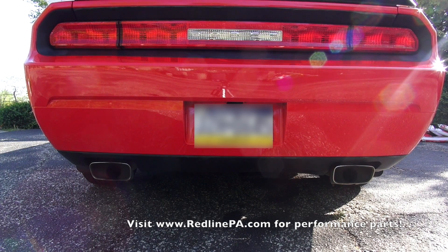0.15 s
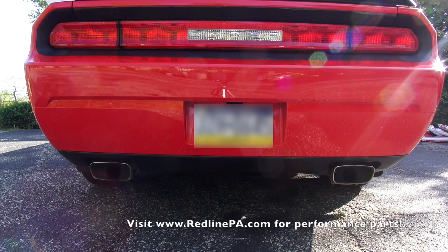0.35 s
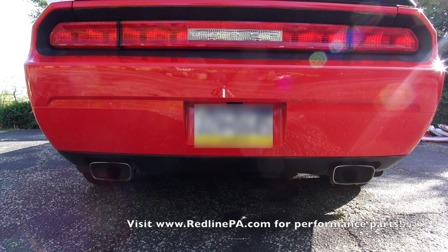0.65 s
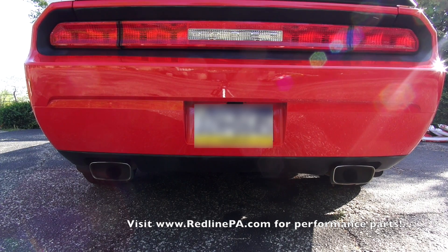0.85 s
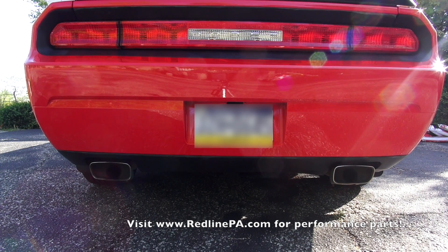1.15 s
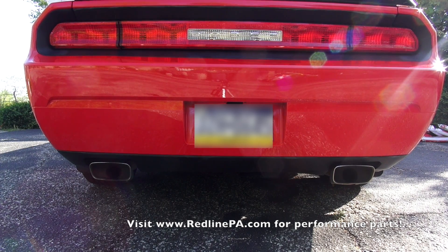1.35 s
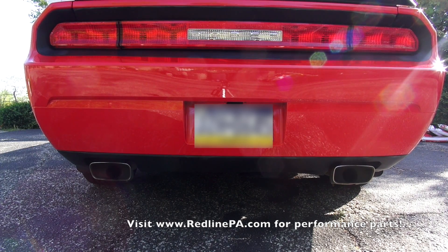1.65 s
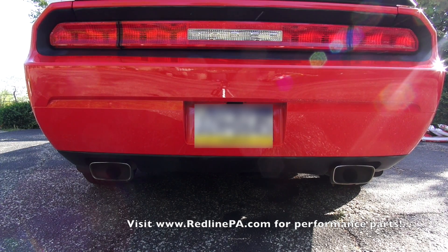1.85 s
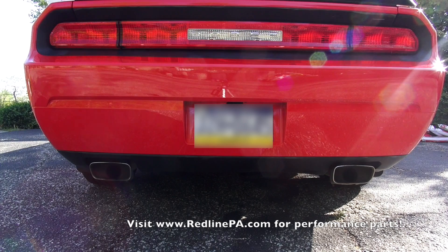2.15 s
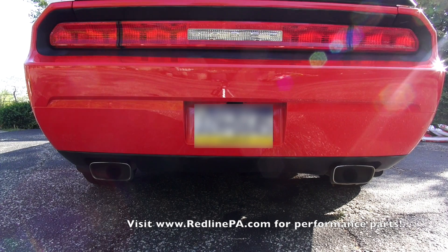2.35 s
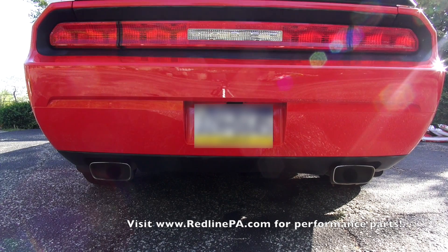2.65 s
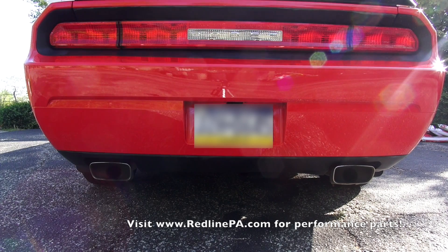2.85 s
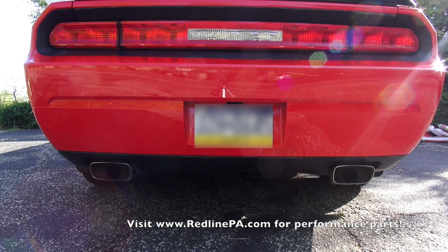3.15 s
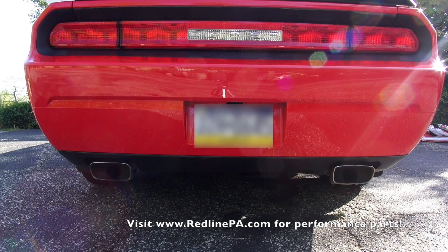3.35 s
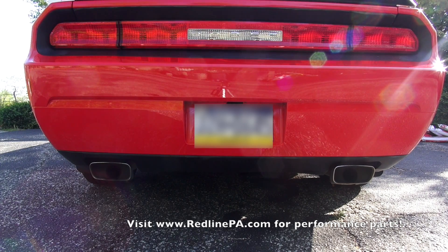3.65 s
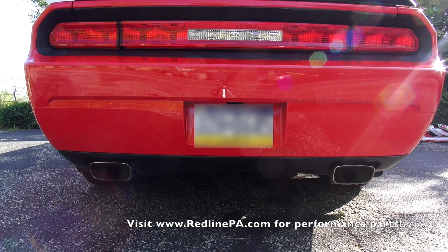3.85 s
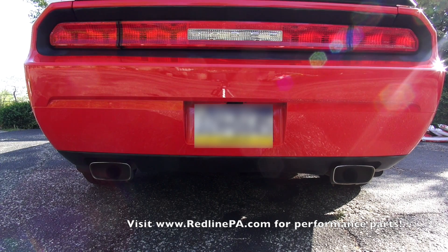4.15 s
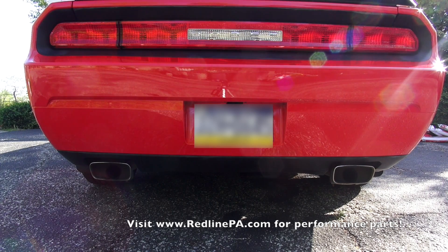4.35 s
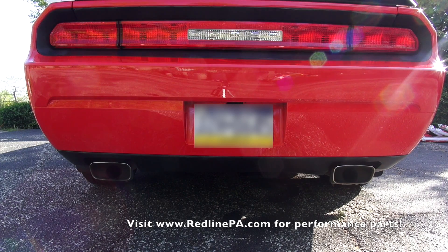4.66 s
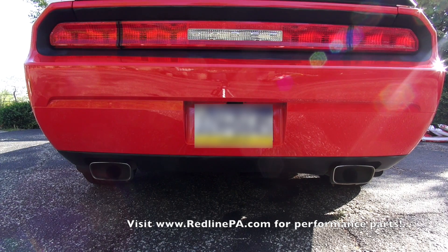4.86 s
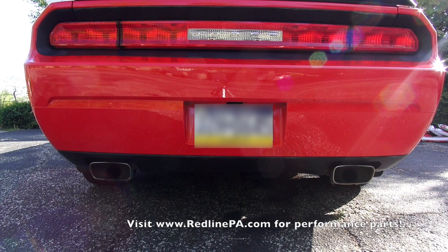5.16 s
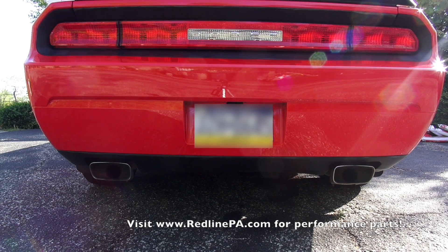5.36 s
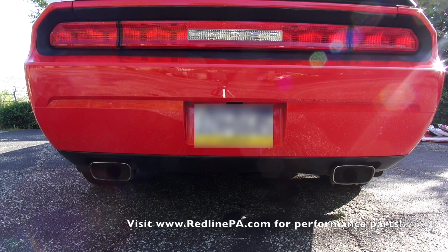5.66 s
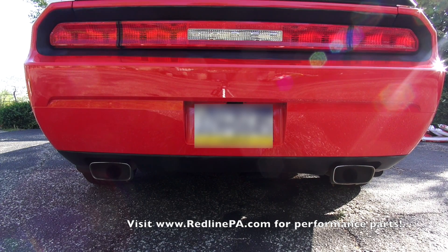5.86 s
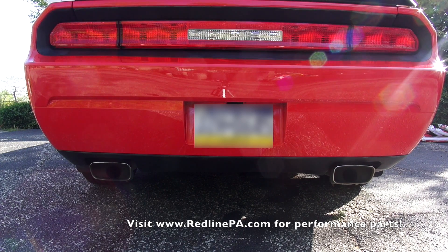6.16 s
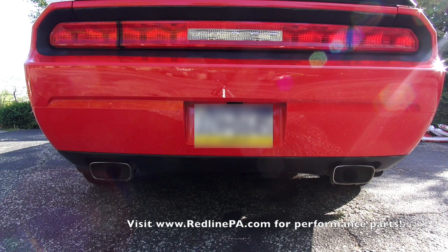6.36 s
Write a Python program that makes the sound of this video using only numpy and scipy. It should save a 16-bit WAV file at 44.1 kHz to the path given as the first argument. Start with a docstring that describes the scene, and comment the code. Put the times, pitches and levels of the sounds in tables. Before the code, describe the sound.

A big V8 car engine is heard close up, from just behind its twin tailpipes, outdoors in a driveway with very little echo. At the start it is already coasting down from a rev, its drone falling in pitch. At about 0.8 seconds it is blipped hard and climbs to a loud, raspy roar, peaking around 1.3 seconds with sharp cracks and hissing gas. It then winds down steadily, spitting a few times until about 2 seconds and deepening into a throaty burble. A very faint high hiss comes and goes from 3 to 5 seconds. By 4.3 seconds the engine has sunk to a lumpy idle of uneven low thumps, and it almost stalls near 5 seconds. It catches, and one small blip around 5.4 to 5.7 seconds lifts it into a stronger, chugging rumble, which eases back toward idle by 6.5 seconds.

```python
"""A big V8 in a driveway, heard from just behind its twin tailpipes.
It coasts down from one rev, is blipped hard, sinks to a lumpy idle and gets one more small blip.
Speed and load ride the levels of the exhaust layers. Even firings give the drone, uneven ones the
burble; gas rasps and hisses in the tips, fast pulses steepen into shocks, and single firings crack.
A faint high hiss and a short scatter off the ground, car and house sit behind it."""
import sys
import numpy as np
from scipy import signal
from scipy.fft import rfft, irfft, next_fast_len
from scipy.io import wavfile
from scipy.ndimage import uniform_filter1d

SR = 44100
rng = np.random.default_rng(int(sys.argv[2]) if len(sys.argv) > 2 else 0)


def wav_out(sig):
    """Save sig, one row per channel (or a flat mono array), as 16-bit PCM at SR to the path in sys.argv[1]."""
    wavfile.write(sys.argv[1], SR, np.round(np.clip(np.atleast_2d(sig).T, -1, 1) * 32767).astype(np.int16))


N = 286650
TIME = np.arange(N) / SR
PUFF_S, PUFF_SHARE = .0026, .16  # a puff's attack is the shorter of this time and this share of a firing

# engine speed, eight firings to a cycle: (time [s], rate [firings/s])
SPEED = [(0.0, 260.6), (0.143, 260.0), (0.793, 177.4), (1.043, 284.1), (1.205, 361.3), (1.285, 379.5),
         (2.398, 201.0), (2.879, 146.5), (3.291, 114.5), (4.268, 59.6), (4.514, 45.8), (4.96, 40.1),
         (5.02, 35.4), (5.14, 42.0), (5.29, 43.6), (5.591, 70.0), (5.742, 72.1), (6.197, 57.8), (6.5, 46.5)]
# blips of the throttle: (opens [s], shuts [s], opening [0-1])
BLIPS = [(-.3, 0.025, 0.89), (0.772, 1.275, 0.83), (5.44, 5.742, 0.58)]
# each cylinder's departure from the mean pulse, in firing order: (pressure [relative])
CYLINDERS = [1.7, -.2, .03, -.15, .57, -.08, -1.75, -.13]
# cylinder bank of each firing: (bank [0 left, 1 right])
BANKS = [0, 1, 1, 0, 1, 0, 0, 1]
# the surge and sag of a slow engine: (time [s], gain [dB])
LOPE = [(3.5, 0), (3.9, 1), (4.02, -1), (4.11, -2.5), (4.24, -0.5), (4.40, 0), (4.52, 0), (4.58, -1.5),
        (4.70, -1.5), (4.8, -2.5), (4.88, -4), (5.0, 0.5), (5.14, 2), (5.27, 2), (5.36, 7), (5.62, -3),
        (5.8, 2.5), (6.05, 0), (6.25, 4), (6.41, -2.5), (6.5, 4.5)]
# accents, the firings that stand out: (time [s], bark [dB], spit [dB], thump [relative dB])
CRACKS = [(0.786, -30, -52, -19.5), (1.027, -4, -12, -26), (1.057, -21, -11.5, -31), (1.159, -13, -3, -34),
          (1.228, -12, -10, -29), (1.248, -23, -8, -21), (1.269, -8, -24, -17.5), (1.374, -25, -18.5, -25),
          (1.447, -21, -24.5, -38), (1.608, -37, -28, -38), (1.659, -28, -19, -37),
          (1.879, -21, -24.5, -35), (3.8876, -32, -42, -17.5), (3.937, -40, -42, -21),
          (3.993, -38, -54, -19), (4.033, -36, -47, -32.5), (4.170, -42, -44, -22), (4.2, -38, -46, -30),
          (4.218, -29.5, -45, -27), (4.239, -39, -48, -24), (4.269, -44, -45, -36),
          (4.357, -35, -48, -18.5), (4.43, -44, -49, -32), (4.471, -34, -49, -24), (4.493, -48.5, -45, -22),
          (4.605, -46, -48, -17), (4.624, -42, -47, -37), (4.721, -37, -48, -17.5),
          (4.791, -40, -45.5, -19), (4.932, -33.5, -41, -19.5), (4.958, -42, -39.5, -17),
          (5.041, -27, -42, -21.5), (5.068, -35, -35.5, -16.5), (5.092, -35, -35, -16.5),
          (5.119, -25, -34, -13.5), (5.143, -27, -38, -23), (5.166, -51, -46, -22),
          (5.215, -24.5, -30, -14), (5.239, -30, -45, -19), (5.286, -34, -29, -10.5),
          (5.331, -27, -28, -18.5), (5.351, -23.5, -28.5, -10.5), (5.371, -13, -30.5, -12.5),
          (5.410, -27, -26.5, -14), (5.432, -19, -25.5, -30), (5.48, -29, -36, -20), (5.517, -24, -39, -21),
          (5.532, -26, -32, -18), (5.547, -25.5, -38, -21), (5.559, -20, -28, -28),
          (5.575, -26.5, -25, -24), (5.606, -28, -28, -31), (5.663, -24, -39, -23), (5.673, -29, -40, -21),
          (5.719, -29, -44, -17), (5.803, -37, -33.5, -12), (5.907, -24, -35, -6.5), (5.92, -31, -41, -21),
          (5.968, -42, -36.5, -6.5), (6.065, -33, -43, -15), (6.113, -29, -56, -10.5),
          (6.136, -46, -45, -10.5), (6.207, -54, -40, -19.5), (6.263, -44, -42, -26),
          (6.281, -47, -39, -13.5), (6.297, -34, -37.5, -18), (6.358, -27, -40, -11),
          (6.432, -29, -43, -10.5)]
# fader of the faint high hiss: (time [s], level [dB])
HIGH_HISS = [(2.55, -81), (2.9, -55), (3.4, -61), (3.87, -59), (4.1, -76), (4.74, -79), (4.82, -57),
             (4.89, -63), (4.97, -84)]

# layer faders, ahead of the lope: (rate [firings/s], level at no load [dB], added by full load [dB])
BURBLE_LEVEL = [(42, -31, 5.5), (70.3, -25, 11), (84, -23, 20), (158, -16.5, -0.5), (277, -16.5, -2),
                (389.6, -15, 4)]
THROAT_LEVEL = [(42.5, -41, 3.5), (61, -30.5, 8.5), (71.3, -27.5, 16.5), (114, -17.5, 3), (160, -29, -6),
                (220, -54, -1)]
RASP_LEVEL = [(41, -46, 13), (71.2, -41, 18), (99.4, -35.5, -13), (137.5, -24.5, 6), (164, -28, 11),
              (268, -18.5, 6.5), (390, -14, 0.5)]
HISS_LEVEL = [(44, -59, 14), (65.3, -58, 26), (109, -46, 13), (138, -39, 20), (171, -42.5, 4),
              (250.5, -39, 14), (363, -27, 7.5)]
SHOCK_LEVEL = [(130, -73, 8), (230, -62, 19), (305, -42, 16), (382, -43, 15)]
# firing tone and its octave through the pipes: (pitch [Hz], level at no load [dB], added by full load [dB])
TONE_LEVEL = [(40, -47.5, 5), (60, -31, 16), (74.5, -36.5, 19), (95, -26.5, 10), (118, -14, 6),
              (122, -21, 5), (201, -15, 6.5), (233, -16, -1), (272, -16.5, 8), (370, -18.5, 12)]
OCTAVE_LEVEL = [(84.5, -37, -12), (117.6, -21.5, 11), (146, -37, 24), (181, -24.5, 10), (230, -21, 10),
                (255, -35, 10), (314, -20.5, 2), (370, -26, 16), (403, -37.5, 19), (546, -24.5, -4),
                (750, -49, 27)]

# EQ of the pipes and mufflers, and of the throaty overtones they pass: (frequency [Hz], gain [dB])
PIPE_EQ = [(20, -53), (38, -17.5), (60, -3.5), (85, -6.5), (110, 6.5), (165, 5), (215, 7), (290, 0),
           (370, 4.5), (430, -3.5), (570, 3.5), (700, -5), (950, -3.5), (1500, -37.5)]
THROAT_EQ = [(150, 2.5), (215, -8.5), (285, -11.5), (345, -10.5), (420, -43), (490, -18.5), (650, -49)]
# EQ of the gas noises at the tips: (frequency [Hz], gain [dB])
RASP_EQ = [(250, -25), (480, 5), (720, -9.5), (920, -4.5), (1060, -0.5), (1300, 0.5), (1550, -5),
           (1850, -5.5), (2150, -27.5), (2450, -21.5), (3200, -13), (6000, -58.5)]
HISS_EQ = [(500, -44.5), (1500, -17), (2000, 11), (2500, 2.5), (2800, 7.5), (3150, 6.5), (3550, 5),
           (4050, 3), (4700, -2.5), (5700, -4.5), (7200, -10.5), (9700, -18), (12000, -24), (15500, -42)]
CRACKLE_EQ = [(400, -12), (750, 14.5), (2100, 11), (2600, 3), (4000, 0), (7000, -5), (9700, -10.5),
              (12000, -13), (15500, -27)]
SPIT_EQ = [(1200, -17.5), (3000, 6.5), (4200, -1.5), (5000, -8), (7000, -8), (8500, -13.5), (9800, -14.5),
           (12000, -23), (15500, -31.5)]
# EQ of the steep pulse fronts and of the shocks: (frequency [Hz], gain [dB])
SNARL_EQ = [(250, -31.5), (400, 0.5), (500, 2.5), (620, 2), (720, -0.5), (920, -10), (1150, 4), (1400, 1.5),
            (1800, -7.5), (2400, -22.5), (4000, -79.5)]
SHOCK_EQ = [(1200, -11.5), (3500, 8), (6000, -0.5), (10000, -29.5), (15000, -29)]
# stereo lean: (frequency [Hz], left minus right [dB])
LEAN = [(35, -2), (70, 1.5), (130, 1.6), (200, -.3), (300, -1.4), (500, -1.7), (1000, -.2), (8000, .3)]

# pipe standing waves at low flow, booms at fast flow: (frequency [Hz], nominal width [Hz], send [dB])
PIPE_MODES = [(119.3, 6, -4.5), (225.5, 11, -1.5), (313, 37, 0), (476, 18, 5.5)]
BOOMS = [(243, 13, -1), (274, 17, -2), (373, 21.6, 2.5)]
# ring of the tailpipe tips: (frequency [Hz], nominal width [Hz], gain [dB])
TIP_MODES = [(480, 90, -9), (1064, 200, 4), (1366, 980, 0), (1530, 350, -4.5), (1728, 240, 1),
             (2316, 280, 4), (2870, 230, 3), (3120, 670, 3.5), (4130, 1330, 0), (5550, 3100, 3.5),
             (7320, 5000, 0.5), (9200, 4100, 2)]
# muffler chambers: (round trip [s], share thrown back [0-1])
CHAMBERS = [(.0023, 0.11), (.0047, 0.47), (.0083, 0.41)]


def amp(db):
    """Decibels to gain."""
    return 10 ** (np.asarray(db) / 20)


def unit(x):
    """Scales to rms 1."""
    return x / np.sqrt(np.mean(x ** 2) + 1e-20)


def steady(x, size=4400):
    """Levels out the slow swell of a sound and keeps its throb."""
    power = uniform_filter1d(uniform_filter1d(x ** 2, size), size)
    return x / np.sqrt(abs(power) + 1e-12)


def colour(x, points, size=8192):
    """Causal EQ through the given (frequency [Hz], gain [dB]) points."""
    hz, db = np.transpose(points)
    log_hz = np.log(abs(np.fft.fftfreq(size, 1 / SR)) + 1)
    log_gain = np.log(amp(np.interp(log_hz, np.log(hz), db)))
    response = np.fft.ifft(np.exp(np.conj(signal.hilbert(log_gain)))).real
    return signal.oaconvolve(x, response[:size // 2])[:N]


def clicks(times, sizes):
    """Impulses at the given times."""
    return np.bincount(np.clip(np.round(times * SR).astype(int), 0, N), sizes, N + 1)[:N]


def level(table, rate, load):
    """A layer's fader in dB, set by engine speed and shifted by load."""
    per_s, base_db, load_db = np.transpose(table)
    at, points = np.log(rate), np.log(per_s)
    return np.interp(at, points, base_db) + load * np.interp(at, points, load_db)


def high_hiss():
    """Faint, smooth treble air that comes and goes as the engine sinks to idle."""
    band = signal.butter(2, [4500, 10500], "bandpass", fs=SR)
    air = unit(signal.lfilter(*band, rng.standard_normal(N)))
    return amp(np.interp(TIME, *np.transpose(HIGH_HISS))) * air


def driveway(x, echo_db=-15, rt60_s=.18, size=9000):
    """Adds scatter from the ground, the car and the house, different left and right."""
    age = np.arange(size) / SR
    taps = rng.standard_normal((2, size)) * (rng.random((2, size)) < .05) * amp(-60 * age / rt60_s)
    taps /= np.linalg.norm(taps, axis=1, keepdims=True)
    send = colour(x, [(100, -8.0), (500, 0.5), (1500, -7.5), (4000, -3.5), (8000, 7.5), (13000, -4.0)])
    return x + amp(echo_db) * signal.oaconvolve(send[None], taps, axes=1)[:, :N]


def ring(x, modes, share, max_q=15):
    """Blends in pipe resonances; the gas flow keeps them from getting sharp."""
    ringing = sum(amp(db) * signal.lfilter(*signal.iirpeak(hz, min(hz / width, max_q), SR), x)
                  for hz, width, db in modes)
    return x + share * ringing


def pipes(x, calm=1):
    """The body of the exhaust: a broad EQ, and standing waves that ring while the flow is calm."""
    return ring(colour(x, PIPE_EQ), PIPE_MODES, calm)


def muffler(x):
    """Each chamber passes all frequencies but smears a pulse over its round trips."""
    size = next_fast_len(N + SR // 4)
    hz, spectrum = np.fft.rfftfreq(size, 1 / SR), rfft(x, size)
    for delay, back in CHAMBERS:
        trip = np.exp(-2j * np.pi * hz * delay)
        spectrum = spectrum * (trip - back) / (1 - back * trip)
    return irfft(spectrum, size)[:N]


def tips(x, calm=1, eddy_db=5.5, eddies_per_s=110):
    """The tips round each puff into a short ring; eddies shift its colour and a fast flow damps it."""
    ringing, moments = 0, TIME * eddies_per_s
    for hz, width, db in TIP_MODES:
        eddies = np.clip(rng.standard_normal(int(moments[-1]) + 2), -2, 1.6)
        fed = x * np.interp(moments, np.arange(len(eddies)), unit(amp(eddy_db * eddies)))
        mode = signal.iirpeak(hz, max(hz / width, 2), SR)
        ringing = ringing + amp(db) * signal.lfilter(*mode, signal.lfilter(*mode, fed))
    wet = .8 * calm
    return (1 - wet) * x + wet * ringing


def puff(age):
    """Outflow envelope of one firing: it swells to 1 at age 1 and dies."""
    return (age * np.exp(1 - age)) ** 1.5


def jet(fired, rate, strength, leak, eq, calm, lag_firings=.17):
    """Turbulent gas through the tips: a short puff for each firing, over the flow that leaks between."""
    arrived = np.maximum(fired - lag_firings, 0)
    gate = strength[arrived.astype(int)] * puff((arrived % 1) / np.minimum(PUFF_SHARE, rate * PUFF_S))
    gas = (leak + gate) * rng.standard_normal(N)
    return steady(tips(colour(gas, eq), calm))


def shocks(times, strength):
    """Bright ticks: at high speed the strongest pulses steepen into shocks."""
    return steady(colour(clicks(times, strength ** 2), SHOCK_EQ))


def hiss(fired, rate, strength, torn, leak, idling, flat_out, hiss_db):
    """Hiss at the tips. A loud jet tears into a broad crackle, and the ticks of idling are bright too."""
    smooth = jet(fired, rate, strength, leak, HISS_EQ, calm=.19 + 1.14 * idling)
    crackle = jet(fired, rate, torn, .58 * leak, CRACKLE_EQ, calm=.19 * idling)
    edge = amp(1.4 * (hiss_db + 29.5)) * (.5 * (1 - idling) + .43 * flat_out) + 1.34 * idling
    return amp(hiss_db) * (smooth + edge * crackle)


def snarl(times, uneven, bank_delay_s=.00061, jostle_s=.00007):
    """Steep pulse fronts, jostled by the flow; one bank's longer path brings out the cycle's orders."""
    late = bank_delay_s * np.resize(BANKS, len(times)) + jostle_s * rng.standard_normal(len(times))
    return steady(muffler(colour(clicks(times + late, 1 + 1.38 * uneven), SNARL_EQ)))


def rasp(gas, fronts, idling, flat_out):
    """Midrange grit: at speed the pulse fronts take over from the gas, unless full flow roughens them."""
    thinned = colour(gas, [(550, -3), (1000, 0)])
    grit = idling * gas + (1 - idling) * thinned
    clean = .64 * (1 - idling) - .4 * flat_out
    return np.sqrt(1 - clean) * grit + np.sqrt(clean) * fronts


def cracks(rate, thump_trim_db=-30, linger_db=-15, size=1300):
    """Hard firings bark and spit in the tips, linger, and thump in the pipes. Fast ones are tighter."""
    starts, bark_db, spit_db, thump_db = np.transpose(CRACKS)
    flow = np.zeros((2, N + size))
    for start, gains in zip(starts, amp(np.c_[bark_db, spit_db])):
        at = int(start * SR)
        age = np.arange(size) / SR / min(PUFF_S, PUFF_SHARE / rate[at])
        flow[:, at:at + size] += gains[:, None] * np.maximum(puff(age), amp(linger_db) * puff(age / 3))
    bark, spit = flow[:, :N] * rng.standard_normal((2, N)) + 1e-12
    bark = np.std(bark) * unit(tips(colour(bark, RASP_EQ)))
    spit = np.std(spit) * unit(tips(colour(spit, SPIT_EQ), calm=.59))
    pushes = clicks(starts, amp(thump_db))
    thump = unit(muffler(pipes(colour(pushes, [(120, 6.5), (500, -24.5)]))))
    return bark + spit + np.linalg.norm(pushes) * amp(thump_trim_db) * thump


def burble(fired, uneven, idling, load, width_firings=.098, steps=64):
    """Unequal firings, each a push and a suck over a set crank angle; speed and load make them boom."""
    grid = np.zeros(len(uneven) * steps)
    grid[::steps] = uneven
    age = np.arange(4 * steps) / steps / width_firings
    pressure = np.convolve(grid, np.gradient(age ** 2 * np.exp(-age)))
    pulses = steady(np.interp(fired * steps, np.arange(len(pressure)), pressure))
    turbulence = amp(-6.5 + 2.5 * idling) * rng.standard_normal(N)
    body = steady(muffler(pipes(pulses + turbulence, calm=idling)))
    return ring(body, BOOMS, share=np.clip(1 - idling + .5 * load, 0, 1))


def drone(fired, rate, load):
    """What all firings share: a tone, its octave and throaty overtones, wavering with the crank."""
    wander = steady(colour(rng.standard_normal(N), [(15, 0), (60, -40), (300, -90)]))
    phase = 2 * np.pi * (fired + np.interp(rate, [80, 200], [.014, .011]) * wander)
    tone = amp(level(TONE_LEVEL, rate, load)) * np.cos(phase)
    octave = amp(level(OCTAVE_LEVEL, 2 * rate, load)) * np.cos(2 * phase)
    hz, db = np.transpose(THROAT_EQ)
    throat = sum(amp(np.interp(k * rate, hz, db)) * np.cos(k * phase - k ** 2) for k in range(3, 9))
    return np.sqrt(2) * (tone + octave + amp(level(THROAT_LEVEL, rate, load)) * throat)


def engine_speed():
    """Firings per second, gliding exponentially between turning points."""
    times, per_s = np.transpose(SPEED)
    return np.exp(np.interp(TIME, times, np.log(per_s)))


def engine_load(fill_s=.024, empty_s=.011, valve_s=4.96, valve_opening=.36):
    """Charge in the cylinders, 0-1: throttle and idle valve, lagging as the manifold fills and empties."""
    def settled(start, lag_s):
        return 1 - np.exp(-np.maximum(TIME - start, 0) / lag_s)
    blips = sum(opening * (settled(opens, fill_s) - settled(shuts, empty_s))
                for opens, shuts, opening in BLIPS)
    return blips + valve_opening * settled(valve_s, fill_s)  # the valve opens just short of a stall


def combustion(times, idling, throttle, flat_out):
    """Per firing: its departure from the mean pulse, its puff strength, and a spikier one for crackle."""
    luck, scatter = rng.standard_normal((len(times), 2)).T
    # combustion varies most at idle and at full throttle, the puffs scatter most when coasting
    ragged = np.interp(times, TIME, idling * (1 - .5 * throttle) + .5 * flat_out)
    scatter_db = np.interp(times, TIME, 2.8 + 5.2 * (1 - idling) * (1 - throttle))
    uneven = np.resize(CYLINDERS, len(times)) + luck * (.18 + .8 * ragged)
    slow = np.interp(times, TIME, idling)
    strength = amp((2 - 1.1 * slow) * uneven + scatter_db * np.clip(scatter, -2, 1.3))
    return uneven, strength, strength ** (2.3 - 1.1 * slow)


def scene():
    """Speed times the firings; load makes them loud, throttle makes them sharp, idling makes them ragged."""
    rate, load = engine_speed(), engine_load()
    fired = np.cumsum(rate) / SR  # running count of firings
    times = np.interp(np.arange(int(fired[-1]) + 2), fired, TIME)
    # the engine pulls while it gains speed
    throttle = np.clip(uniform_filter1d(np.gradient(np.log(rate)) * SR, 3000) / .55, 0, 1)
    idling = np.clip(1.4 - rate / 110, 0, 1)
    flat_out = throttle * (1 - idling)
    uneven, strength, torn = combustion(times, idling, throttle, flat_out)
    # slow firings under load leave the tips as separate puffs
    pulling = np.maximum(throttle, np.clip(2 * load - 1, 0, 1))
    leak = amp(idling * (6 - 18 * pulling))
    gas = jet(fired, rate, strength, .8 * leak, RASP_EQ, calm=idling)
    exhaust = amp(level(RASP_LEVEL, rate, load)) * rasp(gas, snarl(times, uneven), idling, flat_out)
    exhaust += hiss(fired, rate, strength, torn, leak, idling, flat_out, level(HISS_LEVEL, rate, load))
    exhaust += amp(level(SHOCK_LEVEL, rate, load)) * shocks(times, strength)
    exhaust += drone(fired, rate, load)
    exhaust += amp(level(BURBLE_LEVEL, rate, load)) * burble(fired, uneven, idling, load)
    lope = amp(np.interp(TIME, *np.transpose(LOPE)))
    return driveway(lope * exhaust + cracks(rate) + high_hiss())


def limiter(x, ceiling_db=-8.0, release_db_per_s=90, size=400):
    """Ducks the loudest moments at once and lets go gradually."""
    power_db = 10 * np.log10(abs(uniform_filter1d((x ** 2).mean(0), size)) + 1e-12)
    fall = TIME * release_db_per_s
    over_db = np.maximum(np.maximum.accumulate(power_db + fall) - fall - ceiling_db, 0)
    return x / amp(uniform_filter1d(over_db, size))


def record(dry):
    """Two close microphones, each with its own tilt, into a limiter, a soft clip and a high cut."""
    hz, db = np.transpose(LEAN)
    lean_db = np.interp(np.log(np.fft.rfftfreq(N, 1 / SR) + 1), np.log(hz), db)
    pair = limiter(irfft(rfft(dry) * amp(np.array([[.5], [-.5]]) * lean_db), N))
    rounded = pair / (1 + (pair / .97) ** 8) ** (1 / 8)
    high_cut = signal.firwin(511, 15750, window=("kaiser", 9), fs=SR)
    return signal.oaconvolve(rounded, high_cut[None], "same")


dry = scene()
out = record(dry)
wav_out(out)
```